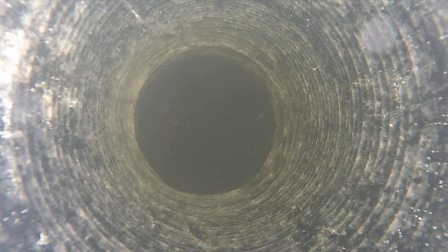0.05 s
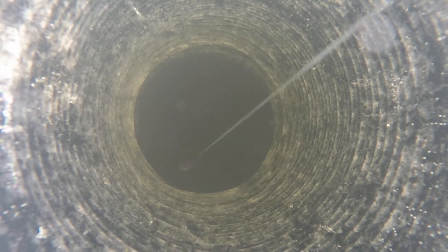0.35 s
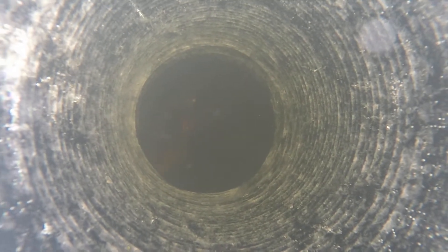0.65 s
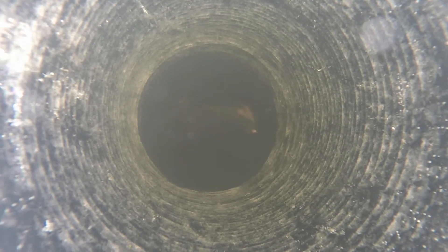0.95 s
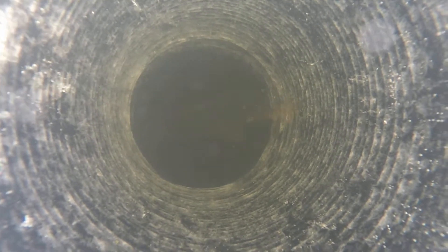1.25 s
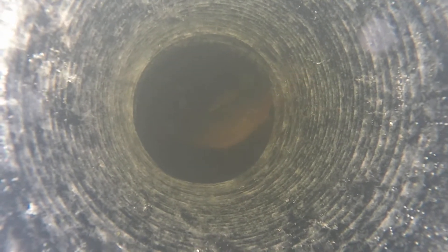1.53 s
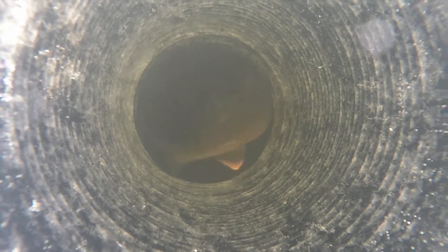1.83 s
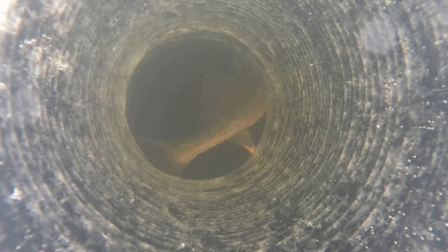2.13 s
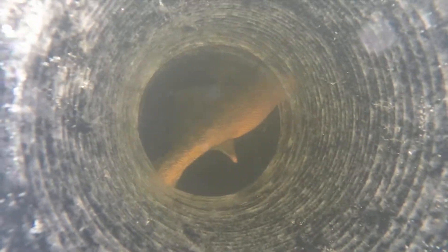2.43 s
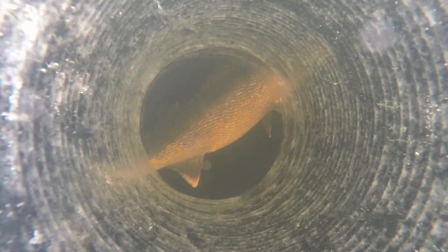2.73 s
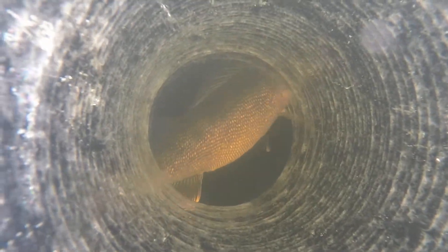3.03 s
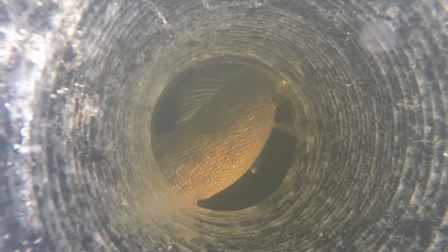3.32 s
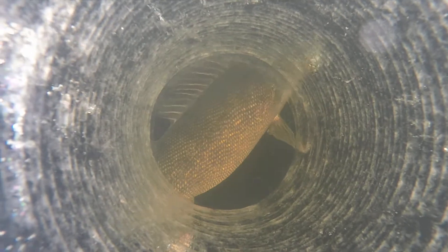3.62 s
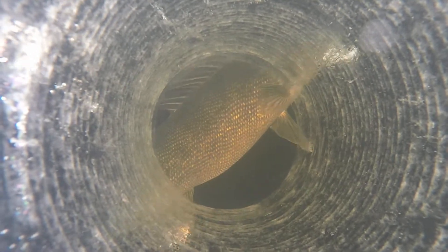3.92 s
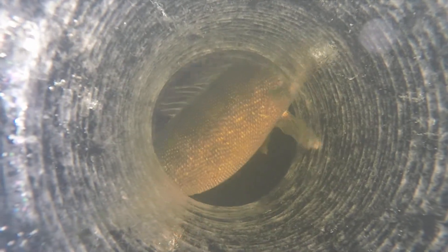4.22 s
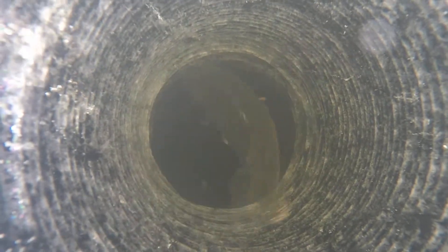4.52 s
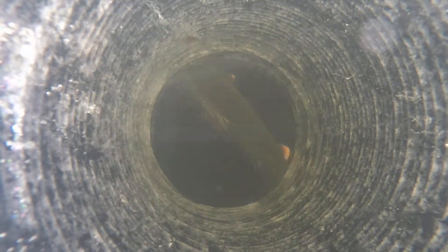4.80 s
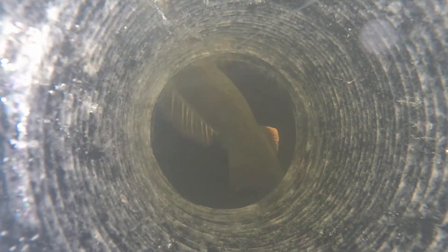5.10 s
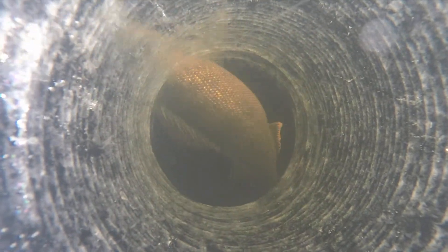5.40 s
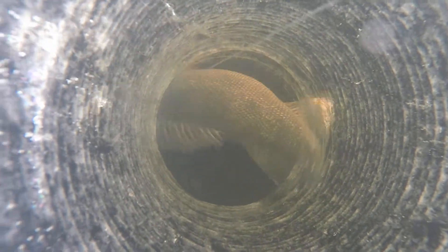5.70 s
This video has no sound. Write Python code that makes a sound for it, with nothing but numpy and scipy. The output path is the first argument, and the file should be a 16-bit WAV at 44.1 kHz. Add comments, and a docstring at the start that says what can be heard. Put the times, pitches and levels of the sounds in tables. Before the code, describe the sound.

A fish jolts the water with dull, close bumps and a brief rasp, then fishing line saws against the rim of an ice hole.

```python
"""An ice-fishing hole, heard from under water through the microphone of a hanging camera.
A hooked fish struggles below: jolts of water and line thud in the housing, right at the microphone.
Something rasps along the housing, air gurgles up and the fish turns with a swish. At the end the line
saws over the rim of the ice overhead, catching and slipping, hollow between the walls of the hole.
Close by the line ticks and water washes past; behind it all lie a low rumble and a faint hiss."""
import sys
import numpy as np
from scipy import signal
from scipy.fft import rfft, irfft
from scipy.io import wavfile
from scipy.ndimage import uniform_filter1d

SR = 44100
rng = np.random.default_rng(int(sys.argv[2]) if len(sys.argv) > 2 else 0)


def int16_out(signal):
    """Quantize to a 16-bit WAV file."""
    q = np.round(np.clip(np.atleast_2d(signal).T, -1, 1) * 32767)
    wavfile.write(sys.argv[1], SR, q.astype(np.int16))


N = 253575
TIME = np.arange(N) / SR

# Levels are relative: each source applies its own gains and filters on the way to the microphone.
# jolts of the housing: (time [s], thud level [dB], thud pitch [Hz], knock level [dB])
JOLTS = [(0.0541, -21, 136, -63), (0.1013, -16.5, 149, -30.5), (0.1304, -18.5, 114, -56),
         (0.284, -17, 64.7, -27), (0.3967, -0.5, 112.8, -21.5), (0.6273, -22, 124, -40),
         (.675, -36, 65, -47), (0.7788, -37, 54.7, -42.5), (0.884, -27, 111, -74),
         (1.1125, -17.5, 88.4, -31), (1.203, -16.5, 70, -33), (1.2211, -6, 95, -21.5),
         (1.2842, -5, 95.5, -27), (1.3142, -15.5, 111, -36), (1.6852, -16.5, 133, -31.5),
         (1.7009, -14.5, 147, -24), (1.7173, -16.5, 55.5, -53), (1.8294, -10.5, 93.4, -30),
         (1.861, -14.5, 127, -54), (1.918, -19, 87.4, -32), (1.9473, -13, 94.3, -29),
         (1.984, -17, 158, -31.5), (2.0209, -2, 133.7, -17), (2.2553, -20.5, 125.2, -30.5),
         (2.3091, -8, 120, -14), (2.3366, -14, 177, -18), (2.3932, -13.5, 78.7, -16.5),
         (2.4203, -7, 153.3, -12), (2.5118, -24, 93.5, -30.5), (2.583, -28, 154, -39),
         (2.666, -42, 53, -47.5), (2.8425, -30.5, 142, -37.5), (2.9818, -11.5, 143, -27.5),
         (3.0606, -13.5, 146, -26), (3.184, -28, 79, -59), (3.2826, -11, 161, -24.5),
         (3.3086, -14.5, 130, -25), (3.401, -10.5, 81, -20), (3.442, -31, 204, -40),
         (3.4515, -12, 50.5, -45), (3.4965, -21, 214, -42), (3.5363, -12.5, 202, -19),
         (3.529, -18.5, 70, -45), (3.789, -26.5, 131, -39.5), (4.3545, -21, 148, -32),
         (4.368, -26, 166, -47), (4.4628, -20, 131, -23.5), (4.4771, -15, 53.7, -35),
         (4.8585, -27, 78, -31), (5.0684, -23.5, 136, -26), (5.112, -7, 181, -18.5),
         (5.131, -14.5, 169, -55), (5.4128, -21.5, 65, -40), (5.5106, -17, 187, -21.5),
         (5.7227, -25.5, 201, -24.5)]
# low modes of the housing: (frequency [Hz], t60 [s], gain [dB])
HOUSING_MODES = [(33, 0.18, -17), (85, 0.055, -2.5), (159.5, 0.082, 1), (184.6, 0.1, -16), (269.5, 0.14, 6)]
# high modes of its shell: (frequency [Hz], width [Hz], lift [dB])
SHELL_MODES = [(1137, 43, 7.5), (1664, 15, 1.5), (2026, 160, 3.5), (2613, 58, 6), (3017, 99, 4.5),
               (4300, 46, 10), (4770, 40, -7), (5640, 120, 6), (8600, 300, 8), (10400, 750, 7)]
# spectrum of a knock on the housing: (frequency [Hz], level [dB])
KNOCK_COLOUR = [(150, 3), (260, -2), (340, -10), (480, -1), (590, -8.5), (700, -0.5), (850, -5),
                (1010, -21.5), (1170, -10), (1320, -25.5), (2000, -30.5), (3500, -52)]
# spectrum of the grating in a knock: (frequency [Hz], level [dB])
GRIT_COLOUR = [(600, -7.5), (830, 8.5), (1400, -16.5), (1750, -6.5), (2030, 9.5), (2420, -5.5), (2900, -12),
               (3800, -17), (5600, -12.5), (7300, -39), (8600, -32.5), (15000, -67)]
# spectrum of the housing swaying to rest: (frequency [Hz], level [dB])
SWAY_COLOUR = [(50, -4.5), (90, -5.5), (150, 0.5), (205, -16), (265, -5), (330, -30)]

# the line catches on the ice and lets go: (time [s], level [dB], length [s], lift above 4 kHz [dB])
LINE_SLIPS = [(0.3429, -20, 0.004, 7.5), (.423, -27.5, 0.0022, 19.5), (4.839, -31.5, 0.004, 23.5),
              (4.867, -30, 0.0083, 28), (4.872, -21, 0.0042, 20), (4.9, -14.5, 0.0034, 8),
              (4.954, -26.5, 0.0076, -2), (4.966, -20, .006, 5), (5.01, -5.5, 0.001, 15.5),
              (5.013, -14.5, 0.0025, 20.5), (5.022, -19, 0.015, 10), (5.069, -22, .0033, -6),
              (5.238, -20, 0.0066, 8), (5.362, -8, 0.0046, -14), (5.384, -8.5, 0.004, 4),
              (5.396, -20.5, 0.0059, 3), (5.475, -10.5, .008, 12.5), (5.496, -11.5, 0.0056, 12),
              (5.503, -10.5, 0.0068, 7.5), (5.563, -14, 0.0029, 8.5), (5.631, -15.5, 0.0013, 13.5),
              (5.646, -21.5, 0.0071, 15)]
# steady pulls of the line over the ice:
# (start [s], end [s], start level [dB], end level [dB], hiss level [dB], hiss lift above 7.9 kHz [dB])
LINE_PULLS = [(0.347, 0.425, -27, -35.5, -16, 14.5), (4.722, 4.848, -44, -35.5, -12, 1),
              (4.851, 5.015, -33, -25.5, -12.5, -3.5), (5.008, 5.201, -27, -27, -8.5, -7),
              (5.203, 5.377, -24, -25, -7.5, -13.5), (5.43, 5.64, -26, -33.5, -11, -3.5),
              (5.644, 5.76, -31, -28.5, -14.5, 1)]
# spectrum of crunching ice: (frequency [Hz], level [dB])
ICE_COLOUR = [(300, -14.5), (560, -7), (820, 12.5), (1100, 3), (1350, 9), (1800, 8), (2100, 7), (2400, 6.5),
              (3000, -3.5), (4200, -14), (6000, -14.5), (8500, -31), (15000, -38.5)]
# spectrum of the dragging line: (frequency [Hz], level [dB])
DRAG_COLOUR = [(290, -52), (500, -6), (671, -13.5), (770, 1.5), (934, 3), (1100, -8), (1280, 6), (1440, 0),
               (1620, 4.5), (1880, 3), (2280, 6), (3120, -6), (4500, -9.5), (5850, -68), (9900, -120)]
# spectrum of the line's hiss: (frequency [Hz], level [dB])
LINE_HISS_COLOUR = [(3300, -16), (4100, -17), (5200, 4.5), (5600, 0), (6050, 1), (7400, -8), (8300, -12),
                    (9500, -13.5), (12300, -17), (15300, -27)]
# hollow resonances of the line on the rim: (frequency [Hz], width [Hz], lift [dB])
RIM_MODES = [(2384, 80, 2.5), (5450, 340, -4), (7540, 210, 2.5), (12400, 600, 0)]

# short slips against the housing: (time [s], level [dB], length [s])
HOUSING_SLIPS = [(0.012, -38.5, 0.012), (0.111, -36, 0.0091), (0.29, -36, 0.043), (0.614, -44.5, 0.049),
                 (1.121, -40, 0.037), (1.394, -47, 0.041), (1.91, -38, 0.037), (2.023, -30, 0.003),
                 (2.311, -25.5, 0.0027), (2.916, -46.5, 0.0098), (3.287, -18.5, 0.0087),
                 (3.307, -19.5, 0.004), (3.347, -24, 0.0045), (3.375, -17.5, 0.0043), (3.394, -20.5, 0.013),
                 (3.444, -15, 0.0029), (3.46, -15.5, 0.0074), (3.484, -19, .0054), (3.495, -22, 0.0075),
                 (3.5225, -17.5, 0.0033), (3.532, -18, 0.011), (3.565, -22, 0.0045), (4.438, -24.5, 0.0036),
                 (4.443, -16, 0.0081), (4.467, -18, 0.0036)]
# longer rubs along it: (start [s], end [s], rub level [dB], shudder level [dB])
HOUSING_RUBS = [(3.266, 3.304, -21.5, -26), (3.339, 3.368, -30, -28), (3.376, 3.477, -24.5, -23),
                (3.494, 3.545, -41, -16.5), (3.56, 3.586, -34, -29.5)]
# spectrum of friction on the housing: (frequency [Hz], level [dB])
RASP_COLOUR = [(180, 7), (270, 6.5), (350, -16), (440, 3.5), (520, -4), (800, 4), (950, -2), (1400, -10),
               (2050, -2.5), (2600, -11.5), (3200, -11.5), (4300, -28.5), (5500, -24), (7200, -48),
               (8700, -43), (15000, -56)]

# the clearest bubbles: (time [s], level [dB], starting pitch [Hz], t60 [s])
CLEAR_BUBBLES = [(.184, -26, 809, 0.021), (.674, -34, 880, 0.034), (.803, -34.5, 854, .032),
                 (1.032, -37.5, 800, .03), (1.398, -22.5, 770, 0.048), (1.404, -18, 1440, 0.0079),
                 (1.704, -20, 674, 0.051), (3.904, -39, 630, 0.14)]
# swell of the swish as the fish turns away: (time [s], level [dB])
SWISH_SWELL = [(4.29, -44.5), (4.36, -36), (4.41, -32), (4.47, -29), (4.51, -60)]
# spectrum of its eddies: (frequency [Hz], level [dB])
EDDY_COLOUR = [(110, 3), (170, 3.5), (300, -5), (420, -2.5), (800, -9.5), (1100, -17), (2500, -23.5)]
# clear flicks of the line on the housing: (time [s], level [dB], lift above 4 kHz [dB])
LINE_FLICKS = [(0.753, -39, -21), (0.956, -45.5, -19), (1.286, -27, -9.5), (1.677, -34.5, -8),
               (1.884, -31, 0), (2.312, -26, -29), (2.405, -46, 6), (2.429, -39, 9), (2.848, -74, 23.5),
               (2.963, -46, 0), (3.08, -42, -17), (3.133, -46, -7), (3.675, -51, 8), (3.865, -43.5, -3.5),
               (3.903, -41.5, -27), (4.315, -40.5, 3.5), (4.358, -53.5, 17), (4.399, -52, 14)]
# spectrum of a tick: (frequency [Hz], level [dB])
TICK_COLOUR = [(900, -3.5), (2100, 5), (3000, -6), (3800, -13), (5600, -7), (7300, -18), (8700, -21.5),
               (15000, -29)]

# level of the background wash, which ducks after the loud knock at 2 s: (time [s], level [dB])
WASH_LEVEL = [(0.0, -41.5), (0.21, -44), (0.6, -61), (1.27, -48), (1.42, -57), (1.67, -66), (1.85, -46),
              (2.05, -60), (2.3, -72), (2.43, -56.5), (2.64, -70), (3.07, -55.5), (3.24, -62),
              (3.62, -54.5), (4.058, -62), (4.28, -60.5), (4.492, -60), (4.72, -54.5)]
# spectrum of the washing water: (frequency [Hz], level [dB])
WASH_COLOUR = [(250, -1), (380, -1), (580, -5.5), (690, 1.5), (820, 3.5), (990, -13.5), (1750, -10),
               (2050, -10), (2500, -18), (3500, -31.5), (6000, -36), (12000, -58)]
# spectrum of the low rumble: (frequency [Hz], level [dB])
RUMBLE_COLOUR = [(18, -2.5), (38, 0.5), (70, -6), (150, -8.5), (200, -19.5), (260, -18.5), (330, -31)]
# background hiss, which sinks for a while: (time [s], level [dB])
FLOOR_LEVEL = [(2.0, -71.5), (2.1, -82.5), (2.8, -82), (3.6, -70)]
# spectrum of that hiss: (frequency [Hz], level [dB])
FLOOR_HISS_COLOUR = [(3000, 2), (4500, -4), (6300, -5), (7500, -10), (11300, -10), (13000, -23.5),
                     (15000, -18)]


def housing_jolts(stir, crest_cycles=0.63, sharpness=2.57, blow_db=-1, rattle_db=-5, tail_db=-16,
                  sway_db=-26, knock_s=0.006):
    """At the microphone: a jolt swings the housing a cycle or two, knocks and grates; it sways to rest."""
    thuds, knocks, grits, sways = np.zeros((4, N))
    rattle, grains = crackle(2500, 3.5), crackle(5000, 2.8)
    t = TIME[:SR // 10]
    for s, db, hz, knock_db in JOLTS + jostles(stir):
        cycles = t * hz
        swell = (cycles / crest_cycles * np.exp(1 - cycles / crest_cycles)) ** sharpness
        add(thuds, s, undb(db) * swell * np.sin(2 * np.pi * cycles))
        add(sways, s + 1 / hz, undb(db + sway_db) * burst(rattle, s, 0.034, 0.008))
        # contact comes as the first swing builds: one clean blow, then a short rattle
        contact = s + .27 / hz
        add(knocks, contact, undb(knock_db + blow_db) * np.sqrt([knock_s * SR]))
        add(knocks, contact, undb(knock_db + rattle_db) * burst(rattle, contact, knock_s, 0.0079))
        add(knocks, contact, undb(knock_db + tail_db) * burst(rattle, contact + 0.0072, 0.02, 0.013))
        # the grit is louder with harder knocks and louder wash
        grit_db = 2 + 0.66 * knock_db + 0.46 * wash_db(s)
        add(grits, contact, undb(grit_db) * burst(grains, contact, 0.0028, 0.0027))
    body = thuds + housing_ring(thuds) + colour(sways, SWAY_COLOUR)
    return body + colour(knocks, KNOCK_COLOUR) + resonate(colour(grits, GRIT_COLOUR), SHELL_MODES)


def jostles(stir, per_s=16, db=-26, spread_db=3, hz=112, pitch_spread=0.3, knock_db=-15):
    """Small jolts that come by chance, as strong as the water is stirred; rows like JOLTS."""
    s, size, pitch = scatter(per_s).T
    level_db = db + 20 * np.log10(np.interp(s, TIME, stir)) + spread_db * size
    rows = np.column_stack([s, level_db, hz * np.exp(pitch_spread * pitch), level_db + knock_db])
    return list(rows[s < TIME[-1] - .05])


def housing_ring(thuds):
    """The housing rings low around the microphone, each mode dying away at its own rate."""
    out = 0
    for hz, t60, db in HOUSING_MODES:
        pole = np.exp((2j * np.pi * hz - np.log(1000) / t60) / SR)
        mode = signal.lfilter([1], [1, -pole], thuds + 1e-18).real
        out = out + 2 * undb(db) * (1 - abs(pole)) * mode
    return out


def line_sawing(slip_db=-3.5, drag_db=-3, hiss_db=-1, patchy_db=2.5, shake_db=-36,
                chip_hz=1900, chip_spread=0.375, chip_width_hz=320, chip_db=5):
    """Overhead: the line hisses over the ice rim, shakes the housing and crunches free of each catch."""
    force, catches = np.zeros(N), crackle(9000, 3.3)
    for s, db, length, crisp_db in LINE_SLIPS:
        # every chip of ice rings at pitches of its own
        pitches = chip_hz * np.exp(chip_spread * rng.uniform(-1.014, 1, size=2))
        chip_modes = [(hz, chip_width_hz, chip_db) for hz in pitches]
        crunch = crispen(burst(catches, s, length, 0.0015), crisp_db)
        add(force, s, undb(db + slip_db) * resonate(crunch, chip_modes))
    grip = unit(undb(patchy_db * wander(110)))
    drag = colour(crackle(6000, 5.7), DRAG_COLOUR)
    hiss = colour(crackle(12000, 13.6), LINE_HISS_COLOUR)
    rim, pulling = colour(force, ICE_COLOUR), np.zeros(N)
    for start, end, start_db, end_db, top_db, bite_db in LINE_PULLS:
        pull = grip * stroke([start, end], [start_db, end_db])
        rim += pull * (undb(drag_db) * drag + undb(top_db + hiss_db) * crispen(hiss, bite_db, hz=7900))
        pulling += stroke([start, end], [0, 0])
    shake = undb(shake_db) * colour(pulling * rng.standard_normal(N), RUMBLE_COLOUR)
    return hole_echoes(resonate(rim, RIM_MODES)) + shake


def hole_echoes(x, lag_s=.0021, drift=0.065, echo=0.33):
    """Sound bounces between the walls of the hole; the path shifts as the contact slides round the rim."""
    lag = lag_s * np.exp(drift * wander(7))
    return sum((-echo) ** k * np.interp(TIME - k * lag, TIME, x) for k in range(3))


def housing_rasp(rub_db=-2, patchy_db=3, shudder_db=-1, shudder_hz=261, release_s=0.0028):
    """At the microphone: something drags along the housing in fits and starts and makes it shudder."""
    force, shudder = np.zeros((2, N))
    catches = crackle(3500, 1.5)
    for s, db, length in HOUSING_SLIPS:
        add(force, s, undb(db) * crispen(burst(catches, s, length, release_s), 1.1))
    rub = crackle(5000, 3) * unit(undb(patchy_db * wander(160)))
    for start, end, db, low_db in HOUSING_RUBS:
        contact = stroke([start, end], [0, 0])
        force += undb(db + rub_db) * contact * rub
        shudder += undb(low_db + shudder_db) * contact
    peak = [(shudder_hz / 2, -10), (0.84 * shudder_hz, -13), (shudder_hz, 0), (1.103 * shudder_hz, -28)]
    ring = colour(rng.standard_normal(N), peak)
    return resonate(colour(force, RASP_COLOUR), SHELL_MODES) + shudder * ring


def bubbles(glide=0.2, onset_s=0.00064, wobble_rad=0.67, ring_s=0.029, spread_db=3, pitch_spread=.12,
            gurgle_db=-32, gurgle_hz=597, stray_hz=830, over_wash_db=13):
    """Nearby: air pockets ring, wobble when squeezed and rise in pitch; strays follow the wash level."""
    out, squeeze = np.zeros(N), wobble_rad * wander(600)
    gurgle = [(s, gurgle_db + spread_db * size, gurgle_hz * np.exp(pitch_spread * pitch), ring_s)
              for s, size, pitch in scatter(per_s=85, start=3.65, end=3.78)]
    strays = [(s, wash_db(s) + over_wash_db + spread_db * size,
               stray_hz * np.exp(pitch_spread * pitch), ring_s) for s, size, pitch in scatter(per_s=7)]
    for s, db, hz, t60 in CLEAR_BUBBLES + gurgle + strays:
        bend = squeeze[int(s * SR):][:int(t60 * SR)]
        t = TIME[:len(bend)]
        phase = 2 * np.pi * hz * t * (1 + .5 * glide * t / t60) + bend
        envelope = np.exp(-np.log(1000) * t / t60) * (1 - np.exp(-t / onset_s))
        add(out, s, undb(db) * envelope * np.sin(phase))
    return out


def fish_swish(eddy_db=2.5, fizz_db=-20):
    """From below: the turning fish sweeps eddies past the housing, and fine crackle with them."""
    fizz = undb(fizz_db) * colour(crispen(crackle(500, 7.1) + 1e-18, 3.8), TICK_COLOUR)
    eddies = colour(rng.standard_normal(N), EDDY_COLOUR)
    return (eddies + fizz) * stroke(*np.transpose(SWISH_SWELL)) * undb(eddy_db * wander(70))


def line_ticks(length_s=0.0033, release_s=0.0012, gain_db=-3, over_wash_db=2, spread_db=4,
               faint_crisp_db=-3):
    """Close up: the line flicks the housing, a few times clearly, else faintly, near the wash level."""
    force, catches = np.zeros(N), crackle(6000, 1.3)
    faint = [(s, wash_db(s) + over_wash_db + spread_db * size, faint_crisp_db + spread_db * edge)
             for s, size, edge in scatter(per_s=7)]
    for s, db, crisp_db in LINE_FLICKS + faint:
        add(force, s, undb(db + gain_db) * crispen(burst(catches, s, length_s, release_s), crisp_db))
    return resonate(colour(force, TICK_COLOUR), SHELL_MODES)


def water(stir, wash_gain_db=1, stirred_wash_db=-45, calm_rumble_db=-50, stirred_rumble_db=-25,
          flicker_db=5, heave_db=4.5, tick_db=-8):
    """All around: water washes and ticks on the housing over a heaving rumble; both swell when stirred."""
    force = rng.standard_normal(N) + undb(tick_db) * crackle(100, 4)
    wash = resonate(colour(force, WASH_COLOUR), SHELL_MODES)
    wash *= np.hypot(undb(wash_db(TIME) + wash_gain_db), undb(stirred_wash_db) * stir)
    flicker_depth = np.interp(wash_db(TIME), [-68, -52], [0, 1])  # quiet wash is steady
    wash *= undb(flicker_db * flicker_depth * wander(65))
    rumble = colour(rng.standard_normal(N), RUMBLE_COLOUR)
    rumble *= np.hypot(undb(calm_rumble_db), undb(stirred_rumble_db) * stir)
    rumble *= undb(heave_db * wander(18))
    return wash + rumble


def stirring(rise_s=0.03, settle_s=0.036, db_per_db=0.39):
    """How strongly the water is stirred: each jolt's wake builds just before it and settles after."""
    t = TIME[::SR // 1000]
    power = 0
    for s, db, _, _ in JOLTS:
        fade = np.maximum((s - t) / rise_s, (t - s) / settle_s)
        power = power + undb(db_per_db * db) ** 2 * np.exp(-2 * np.minimum(fade, 20))
    return np.interp(TIME, t, np.sqrt(power))


def wash_db(s):
    """Level of the background wash at the given times."""
    return np.interp(s, *np.transpose(WASH_LEVEL))


def background_hiss():
    """Behind everything: a faint high hiss that sinks for a while midway."""
    level_db = np.interp(TIME, *np.transpose(FLOOR_LEVEL))
    return colour(rng.standard_normal(N), FLOOR_HISS_COLOUR) * undb(level_db)


def crackle(per_s, spread_db):
    """Tiny catches of friction: random clicks of uneven size, rms one."""
    size = undb(spread_db * np.clip(rng.standard_normal(N), -2, 2))
    return unit((rng.random(N) < per_s / SR) * size * np.sign(rng.standard_normal(N)))


def burst(catches, s, length_s, release_s):
    """One slip: a sharp start, a sagging run of catches, a quick release; energy grows with length."""
    t = TIME[:int((length_s + 10 * release_s) * SR)]
    shape = np.exp(-.5 * t / length_s - np.maximum(t - length_s, 0) / release_s)
    x = catches[int(s * SR):][:len(t)]
    x = x * shape[:len(x)]
    return x * np.sqrt(length_s * SR / (np.sum(x ** 2) + 1e-18))


def stroke(times, db, edge_s=0.0046):
    """Gain of one stroke through the given levels, with quick edges."""
    inside = (TIME >= times[0]) & (TIME <= times[-1])
    return uniform_filter1d(inside * undb(np.interp(TIME, times, db)), int(edge_s * SR))


def crispen(x, db, hz=4000):
    """A harder contact lifts the treble, a softer one dulls it."""
    treble = signal.sosfiltfilt(signal.butter(2, hz, "high", fs=SR, output="sos"), x, padtype=None)
    return x + (undb(db) - 1) * treble


def resonate(x, modes):
    """Lift or cut a sound at each narrow resonance."""
    for hz, width, db in modes:
        x = x + (undb(db) - 1) * signal.lfilter(*signal.iirpeak(hz, hz / width, fs=SR), x)
    return x


def colour(x, points, size=4096):
    """Filter of unit power gain through (frequency [Hz], level [dB]) points, falling away beyond them."""
    hz, db = np.transpose(points)
    octave = np.log2(np.maximum(np.arange(size // 2 + 1), .5) * SR / size)
    beyond = np.abs(octave - np.clip(octave, np.log2(hz[0]), np.log2(hz[-1])))
    skirt_db = np.minimum(40 * beyond, 70)
    cepstrum = irfft(np.log(undb(np.interp(octave, np.log2(hz), db) - skirt_db)))
    # minimum phase: nothing rings before it is struck
    cepstrum[1:size // 2] *= 2
    cepstrum[size // 2 + 1:] = 0
    response = irfft(np.exp(rfft(cepstrum)))
    return signal.fftconvolve(x, response / np.linalg.norm(response))[:N]


def wander(per_s):
    """Smooth random wander with a spread of one."""
    step = int(SR / per_s)
    held = np.repeat(rng.standard_normal(N // step + 1), step)
    return unit(uniform_filter1d(held, step)[:N])


def scatter(per_s, start=0., end=N / SR):
    """Loosely spaced chance events: rows of a time [s] and two random deviations with a spread of one."""
    dice = np.random.default_rng(rng.integers(2 ** 31)).random((int((end - start) * per_s), 3))
    s = start + (np.arange(len(dice)) + dice[:, 0]) / per_s
    return np.column_stack([s, np.sqrt(12) * (dice[:, 1:] - .5)])


def undb(db):
    """Decibels to gain."""
    return 10 ** (np.asarray(db) / 20)


def unit(x):
    """Scale to an rms of one."""
    return x / np.sqrt(np.mean(x ** 2) + 1e-18)


def add(out, s, x):
    """Mix a short sound in at a time."""
    i = max(int(s * SR), 0)
    out[i:i + len(x)] += x[:N - i]


def scene():
    """Everything reaches the one submerged microphone through the housing."""
    stir = stirring()
    struggle = housing_jolts(stir) + housing_rasp() + fish_swish() + line_sawing() + line_ticks()
    return (struggle + bubbles() + water(stir) + background_hiss())[None]


def record(dry):
    """The camera clips the largest swings and cuts the treble above 15.55 kHz."""
    lowpass = signal.ellip(8, .2, 70, 15550, fs=SR, output="sos")
    return signal.sosfilt(lowpass, np.clip(dry, -1, 1))


dry = scene()
out = record(dry)
int16_out(out)
```